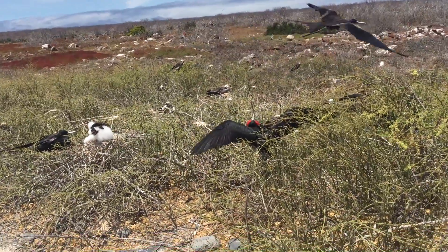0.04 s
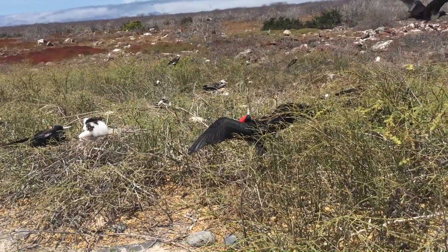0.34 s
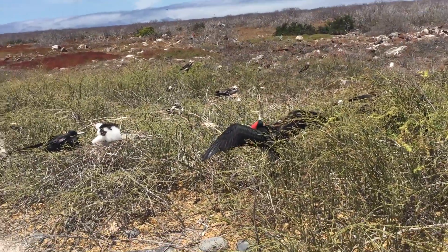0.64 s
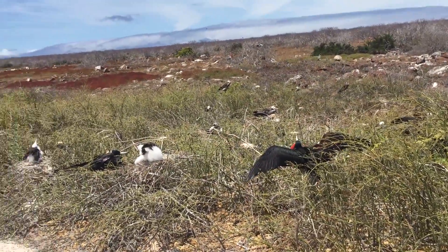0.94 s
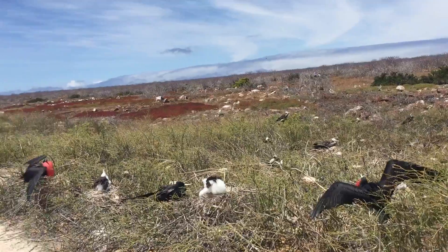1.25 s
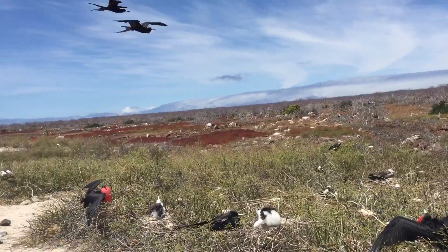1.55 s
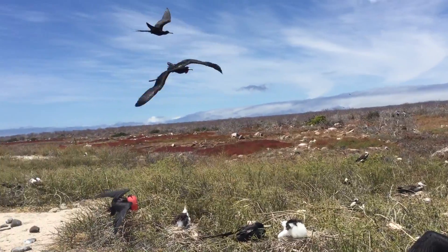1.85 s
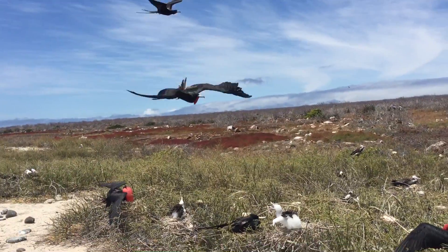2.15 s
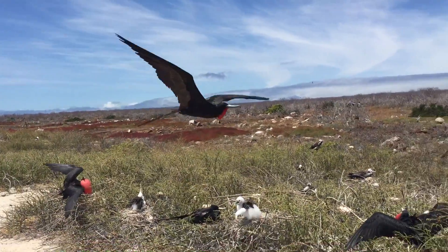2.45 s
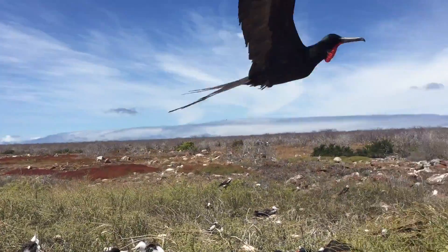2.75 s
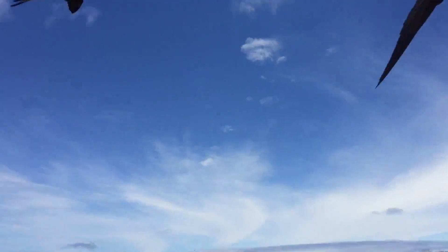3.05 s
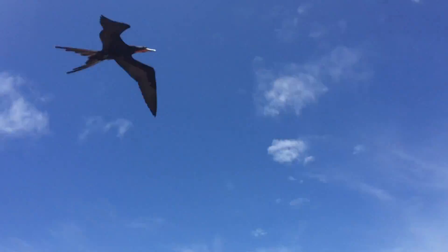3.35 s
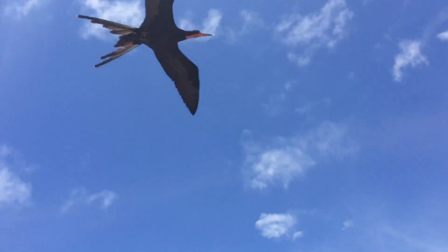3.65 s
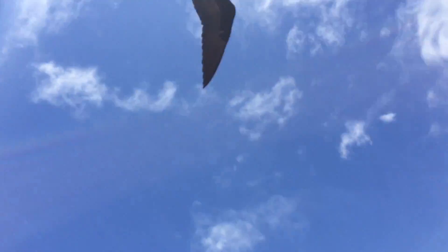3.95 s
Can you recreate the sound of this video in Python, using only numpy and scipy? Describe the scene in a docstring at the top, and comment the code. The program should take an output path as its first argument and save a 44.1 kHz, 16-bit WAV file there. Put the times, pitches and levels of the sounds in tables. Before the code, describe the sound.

Wind rumbles on the microphone in a seabird colony outdoors, with faint far-off chirps and squawks. Bills clack briefly, then a nearby bird rattles in rapid, swooping whistles, and a loud, crackling gust follows.

```python
"""A frigatebird rattles close by, in a colony in dry scrub: a fast run of swooping whistles, hoarse when
low, with pips between them. Others clack their bills; further off, birds rasp and a small one chirps.
Ground and scrub scatter a brief echo, and a far wash of surf and scrub lies behind it all.
Wind buffets the single microphone in short eddies and ends in one strong, crackling gust."""
import sys
import numpy as np
from scipy import signal
from scipy.fft import rfft, irfft, next_fast_len
from scipy.io import wavfile
from scipy.ndimage import uniform_filter1d, minimum_filter1d, map_coordinates

SR = 44100
rng = np.random.default_rng(int(sys.argv[2]) if len(sys.argv) > 2 else 0)


def persist_wave(psi):
    """Save psi, clipped to +-1, as 16-bit WAV."""
    counts = np.round(np.clip(psi, -1, 1) * 32767).astype(np.int16)
    wavfile.write(sys.argv[1], SR, np.atleast_2d(counts).T)


N = 176400  # 4 s
HUSKINESS = 0.56  # depth of the random shake in pips and whistles


def rattle():
    """The near bird: swooping whistles that trail a grainy hiss; hoarse ones gain rasp and an overtone."""
    # notes of the run: (time [s], pitch at the dip [Hz], level [dB])
    notes = [(2.394, 1750, -38.5), (2.427, 1480, -44.5), (2.463, 1400, -40), (2.498, 1630, -37.5),
             (2.534, 1581, -33), (2.573, 1649, -31.5), (2.612, 1748, -32.5), (2.654, 1850, -31.5),
             (2.695, 1844, -31.5), (2.736, 1907, -32.5), (2.778, 2012, -30), (2.823, 1993, -30.5),
             (2.87, 2057, -32.5), (2.914, 2003, -31), (2.96, 2050, -32.5), (3.009, 2040, -33.5),
             (3.055, 2002, -34), (3.105, 1955, -35.5), (3.156, 1870, -32.5), (3.206, 2046, -33.5)]
    # hoarseness by pitch: (pitch [Hz], roughness [0-1])
    roughness = [(1550, 0.27), (1750, 0.59), (2000, 0.18)]
    # spectra of the rasp and the hiss: (frequency [Hz], level [dB])
    rasp_colour = [(1100, -14.5), (1900, 17), (2900, -3), (3550, 2), (4200, -19), (9000, -32.5)]
    hiss_colour = [(4200, 7), (5600, -22), (7400, 0), (8300, -4.5), (9200, 2.5), (10400, -20), (15000, -32)]
    hiss_s, hiss_db = 0.05, -26
    out, sizzle = np.zeros(N), np.zeros(N)
    shake, shimmer, rasp = wobble(700), wobble(780), amp(-1) * noise(rasp_colour)
    lengths = 0.41 * np.gradient(np.transpose(notes)[0])  # a share of the time from note to note
    for (s, hz, db), length in zip(notes, lengths):
        rough = along(roughness, hz)
        u, env = arch(length)
        here = slice(round(s * SR), round(s * SR) + len(u))
        swoop = np.interp(u, [0, 0.34, 1], [243, 0, 250])  # down, then up
        swoop += 3 * rough * (swoop - swoop.mean())  # hoarse notes swoop wider
        phase = phase_of(hz + swoop) + rough * shake[here] / 2
        overtone = amp(-42.5 + 15 * rough) * env ** 2 * np.sin(2 * phase)
        tone = (np.sin(phase) + overtone) * (1 + rough * shimmer[here])
        add(out, s, amp(db) * env * (tone + rough * rasp[here]))
        add(sizzle, s + (length - hiss_s) / 2, amp(db + hiss_db) * arch(hiss_s)[1] * (1 - rough))
    grainy_hiss = unit(noise(hiss_colour) * amp(5 * wobble(330)))
    return out + sizzle * grainy_hiss


def pips():
    """Thin, husky rising pips in the gaps of the rattle."""
    # pips: (time [s], centre pitch [Hz], level [dB])
    calls = [(2.847, 3470, -54), (2.89, 3470, -54.5), (2.935, 3480, -50), (2.987, 3420, -51.5),
             (3.084, 3260, -52), (3.186, 3390, -52)]
    out, shake = np.zeros(N), HUSKINESS * wobble(410)
    u, env = arch(length_s=0.017)
    rise = 1 + 0.089 * (u - .5)
    for s, hz, db in calls:
        phase = phase_of(hz * rise) + shake[round(s * SR):][:len(u)]
        add(out, s, amp(db) * env * np.sin(phase))
    return out * (1 + HUSKINESS * wobble(300))


def whistles():
    """Held whistles before and after the rattle, arching gently in pitch."""
    # whistles: (time [s], length [s], top pitch [Hz], level [dB])
    calls = [(2.363, 0.03, 2035, -36.5), (3.978, 0.021, 3700, -61)]
    out, arch_hz = np.zeros(N), 190
    for s, length, hz, db in calls:
        u, env = arch(length)
        phase = phase_of(hz - arch_hz * (2 * u - 1) ** 2) + HUSKINESS * wobble(330)[:len(u)]
        add(out, s, amp(db) * env * np.sin(phase))
    return out


def squeaks():
    """Thin, high squeaks close by: puffs of noise with a few sharp resonances."""
    # squeaks: (time [s], length [s], level [dB])
    calls = [(2.696, 0.016, -55.5), (3.126, 0.022, -51), (3.222, .04, -59.5)]
    # their spectrum: (frequency [Hz], level [dB])
    colour = [(3600, -8), (4800, -0.5), (5700, -27), (6800, -8), (7900, -30.5), (9200, -2), (10500, -30),
              (15000, -29)]
    return puffs(calls, colour)


def wind():
    """Turbulence on the microphone, by octave: faster air is brighter, the smallest eddies spike."""
    # wind between the eddies: (time [s], level [dB], brightness [dB/octave])
    breeze = [(0, -31, -5), (1.05, -27.5, -5.5), (1.28, -32.5, -6), (1.73, -26.5, -13.5), (1.8, -37.5, -13),
              (2.14, -43, -12.5), (2.2, -23.5, -7.5), (2.55, -31.5, -6), (2.64, -24, -5.5),
              (3.21, -24.5, -4), (3.24, -8.5, 1.5), (3.43, -11, -2), (3.555, -18.5, 1), (3.75, -19, 0.55),
              (3.83, -15, 2.53), (3.9, -27, -3.5)]
    # eddies striking the microphone: (time [s], length [s], level [dB], brightness [dB/octave])
    eddies = [(0.483, 0.037, -16.5, -3.5), (0.53, 0.013, -15, -3), (0.556, 0.037, -20, -3.5),
              (0.587, .004, -14, -2.5), (0.792, 0.0044, -15.5, -7), (0.953, 0.0043, -12.5, -3.5),
              (0.969, 0.0024, -8, -4), (1.035, 0.04, -15, -8), (1.085, 0.007, -17.5, -5.5),
              (1.148, 0.0031, -23.5, -3), (1.196, 0.016, -20, -11), (1.711, 0.019, -22, -7),
              (2.021, 0.044, -27.5, -10), (2.264, 0.014, -17, -4.5), (2.369, 0.028, -16, -3.5),
              (2.48, 0.038, -20.5, -3.5), (2.568, .024, -7.5, -1), (2.707, 0.011, -10.5, -2),
              (2.792, 0.015, -16.5, -2), (2.868, 0.003, -16, -2), (2.944, 0.018, -15.5, -0.5),
              (3.012, 0.015, -17.5, 2.5), (3.129, 0.016, -12, -4.5), (3.196, 0.013, -16.5, -1.5),
              (3.227, 0.014, -3, .5), (3.3, 0.014, -9.5, 4.5), (3.354, .003, -4, 1.5),
              (3.392, 0.0013, -24.5, 11), (3.41, 0.025, -13, 3.5), (3.468, 0.0078, -26.5, 6),
              (3.529, 0.0026, -11, 2), (3.585, 0.026, -18.5, 1), (3.641, 0.066, -20, 2),
              (3.784, 0.011, -16.5, 3.5), (3.958, 0.084, -25, 2.5)]
    # spectrum of the buffeting at zero brightness: (frequency [Hz], level [dB])
    colour = [(18, -32.5), (35, -8.5), (65, 0.5), (135, -1.5), (300, -5), (500, -11.5), (1000, -19.5),
              (1900, -34.5), (2400, -47), (3300, -54), (5000, -76), (15000, -106)]
    pivot_hz, attack_s, release_s = 126.3, 0.00069, 0.0093  # eddy edges in the octave at the pivot
    level, bright = curves(breeze)
    crackle = 2 * np.tanh(wobble(300) / 2)
    sputter_db = -0.13 * level * (2 * np.tanh(wobble(36) / 2) - .5)  # light wind sputters most
    flow, out = noise(colour), np.zeros(N)
    for k in range(-1, 7):
        octaves = max(k, 0.4 * k)  # below the pivot the bass follows only a little
        power = amp(level + sputter_db + bright * octaves) ** 2
        quick = 1 + .5 * octaves  # higher bands start and stop faster
        for s, length, db, tilt in eddies:
            t = np.arange(-SR // 20, int(length * SR) + SR // 20) / SR
            onset = (1 + np.tanh(t * quick / attack_s)) / 2
            release = (1 + np.tanh((length - t) * quick / release_s)) / 2
            add(power, s + t[0], amp(db + tilt * octaves) ** 2 * onset * release)
        band = octave_band(flow, pivot_hz, k)
        spikes = unit(amp(1.9 * octaves * crackle))
        out += (steadied(band) if k < 3 else band) * np.sqrt(power) * spikes
    return out


def clacks():
    """Bills snap shut: a sharp crack and a short tail."""
    # snaps: (time [s], level [dB])
    snaps = [(1.391, -39), (1.411, -39), (1.467, -38.5), (1.517, -31), (1.527, -43)]
    # spectrum of a bill: (frequency [Hz], level [dB])
    colour = [(600, -17.5), (1800, 5.5), (2900, -3), (4500, -11), (6500, -15), (9000, -17), (12000, -18.5),
              (15500, -21.5)]
    power, t = np.zeros(N), np.arange(SR // 5) / SR
    crack_t60_s, tail_t60_s = 0.013, 0.15
    crack, tail = amp(-60 * t / crack_t60_s), amp(-10 - 60 * t / tail_t60_s)
    for s, db in snaps:
        add(power, s, amp(db) ** 2 * (crack ** 2 + tail ** 2))
    return np.sqrt(power) * noise(colour)


def chirps():
    """A small bird further off repeats one falling, slightly quavering chirp, with a close echo."""
    # chirps: (time [s], level [dB])
    calls = [(.024, -56), (.561, -56), (1.055, -54.5)]
    # glide of one chirp: (time [s], pitch [Hz])
    glide = [(0, 3700), (.009, 4270), (.018, 4050), (.04, 3250)]
    out, echo_s = np.zeros(N), 0.012
    at, hz = np.transpose(glide)
    u, env = arch(at[-1])
    pitch = np.interp(u * at[-1], at, hz)
    for s, db in calls:
        quaver = 1 + 0.028 * wobble(410)[:len(u)]
        note = amp(db) * env * np.sin(phase_of(pitch * quaver))
        add(out, s, note)
        add(out, s + echo_s, amp(-10) * note)
    return out * (1 + 0.12 * wobble(270))


def squawks():
    """Hoarse calls from across the colony: noise shaped by the throat."""
    # squawks: (time [s], length [s], level [dB])
    calls = [(.30, .085, -54.5), (.85, 0.079, -53.5), (1.49, 0.06, -47)]
    # resonance of the throat: (frequency [Hz], level [dB])
    throat = [(1000, -28.5), (1550, 1.5), (1950, 11.5), (2450, -10), (4500, -32.5)]
    return puffs(calls, throat)


def rustles():
    """Faint dry rustles in the distance: puffs of high noise."""
    # rustles: (time [s], length [s], level [dB])
    stirs = [(.99, .04, -66), (1.245, .035, -66.5)]
    # their spectrum: (frequency [Hz], level [dB])
    colour = [(3500, -31.5), (5700, 3.5), (9000, -7.5), (14000, -16.5)]
    return puffs(stirs, colour)


def echo(x, t60_s=0.17):
    """Brief scatter from ground and scrub."""
    t = np.arange(SR // 2) / SR
    tail = rng.standard_normal(len(t)) * amp(-60 * t / t60_s)
    return signal.fftconvolve(x, tail / np.linalg.norm(tail))[:N]


def far_wash():
    """Distant surf and scrub swell slowly over a faint, steady hiss."""
    # swell of the wash: (time [s], level [dB])
    swell = [(0, -64), (1.25, -63), (1.55, -56.5), (2.5, -55), (4, -65.5)]
    # spectra of the wash and the hiss: (frequency [Hz], level [dB])
    wash_colour = [(500, 4.5), (1200, 2), (2000, -1), (3000, -6), (4000, -10.5), (4800, -21), (7000, -24.5),
                   (15000, -37)]
    hiss_colour = [(4000, -2), (7000, -1.5), (15500, -12)]
    return amp(curves(swell)[0]) * noise(wash_colour) + amp(-78) * noise(hiss_colour)


def amp(db):
    """Decibels to gain."""
    return 10 ** (np.asarray(db) / 20)


def unit(x):
    """Scale to rms 1."""
    return x / np.sqrt(np.mean(x ** 2) + 1e-20)


def along(points, hz):
    """Read (frequency [Hz], value) points on a log axis."""
    f, v = np.transpose(points)
    return np.interp(np.log(hz + 1), np.log(f + 1), v)


def curves(rows):
    """One value per sample for each column after the time."""
    s, *cols = np.transpose(rows)
    return [np.interp(np.arange(N) / SR, s, c) for c in cols]


def wobble(rate):
    """A smooth random curve, rate knots a second."""
    return map_coordinates(rng.standard_normal(8192), [np.arange(N) * rate / SR], mode="wrap")


def filtered(x, response):
    """Shape x by a gain that depends on frequency."""
    m = next_fast_len(N + SR // 2)
    return irfft(rfft(x, m) * response(np.fft.rfftfreq(m, 1 / SR)), m)[:N]


def octave_band(x, pivot_hz, k):
    """The band k octaves above the pivot; bands -1 and 6 also take all that lies beyond them."""
    return filtered(x, lambda hz: np.maximum(1 - abs(np.log2((hz + 1) / pivot_hz).clip(-1, 6) - k), 0))


def steadied(band):
    """The same noise with a slightly more even strength."""
    swell = np.abs(signal.hilbert(band))
    return unit(band / (swell + 0.6 * swell.mean()) ** 0.2) * band.std()


def noise(colour):
    """Coloured noise of rms 1."""
    return unit(filtered(rng.standard_normal(N), lambda hz: amp(along(colour, hz))))


def add(track, s, sound):
    """Mix a sound into the track at time s."""
    part = track[max(round(s * SR), 0):][:len(sound)]
    part += sound[:len(part)]


def arch(length_s):
    """Progress 0-1 through a sound, and its rounded envelope."""
    u = np.linspace(0, 1, int(length_s * SR))
    return u, np.abs(np.sin(np.pi * u)) ** 0.52


def phase_of(hz):
    """Running phase of a gliding pitch."""
    return 2 * np.pi * np.cumsum(hz) / SR


def puffs(rows, colour):
    """Swells of coloured noise."""
    env = np.zeros(N)
    for s, length, db in rows:
        add(env, s, amp(db) * arch(length)[1] ** 2)
    return env * noise(colour)


def scene():
    """Near and far birds over the wash, with the wind right on the microphone."""
    near = rattle() + pips() + whistles() + clacks() + squeaks()
    far = chirps() + squawks() + rustles()
    wash = far_wash()
    scatter = echo(amp(-12) * near + amp(-13.5) * far)
    return (near + far + scatter + wash + wind())[None]


def record(dry):
    """A fast limiter holds down the strongest gust; the deepest bass and the highest treble are cut."""
    ceiling, low_cut_hz, top_hz = 0.68, 42, 15800
    hold = int(0.008 * SR)
    gain = ceiling / np.maximum(np.abs(dry[0]), ceiling)
    gain = uniform_filter1d(minimum_filter1d(gain, hold), hold)
    return filtered(dry[0] * gain, lambda hz: (hz < top_hz) * np.tanh((hz / low_cut_hz) ** 2))[None]


dry = scene()
out = record(dry)
persist_wave(out)
```